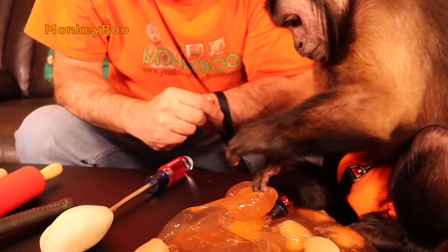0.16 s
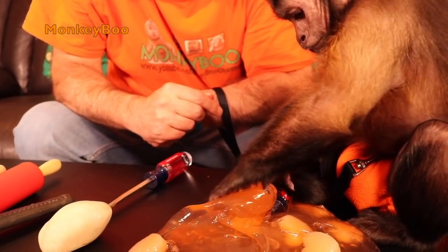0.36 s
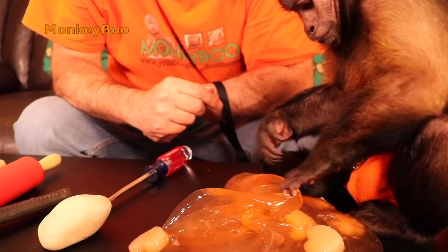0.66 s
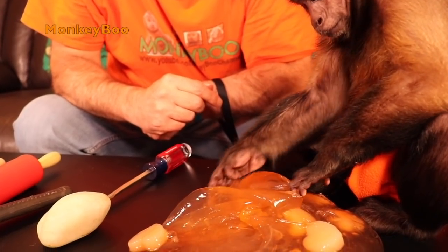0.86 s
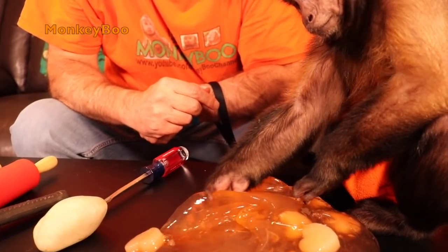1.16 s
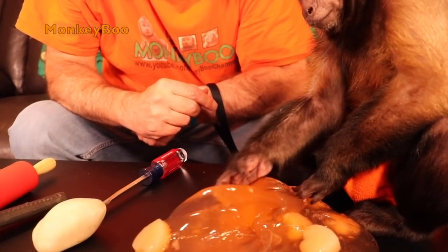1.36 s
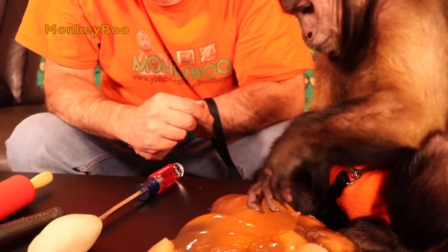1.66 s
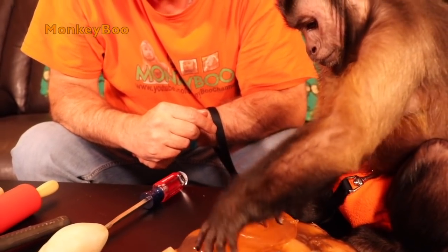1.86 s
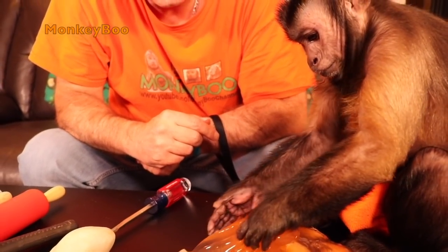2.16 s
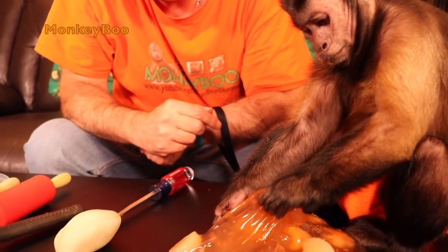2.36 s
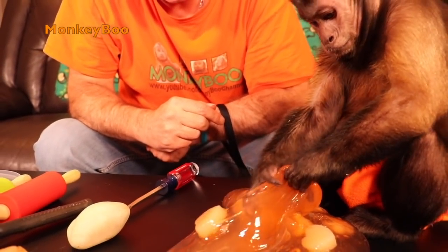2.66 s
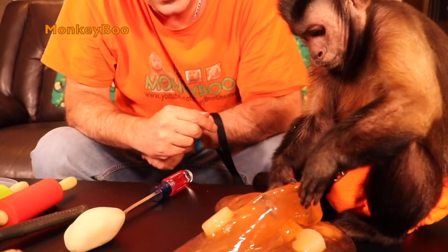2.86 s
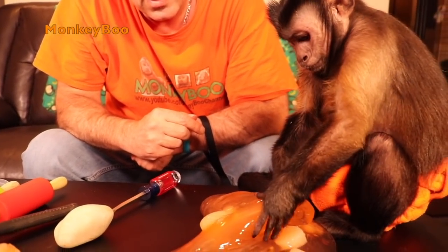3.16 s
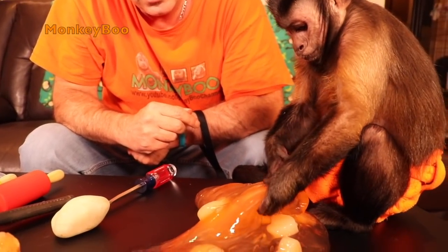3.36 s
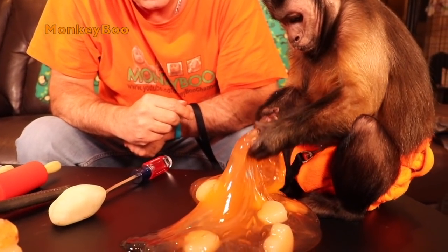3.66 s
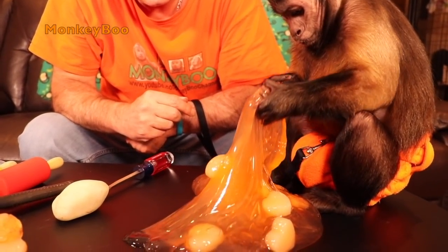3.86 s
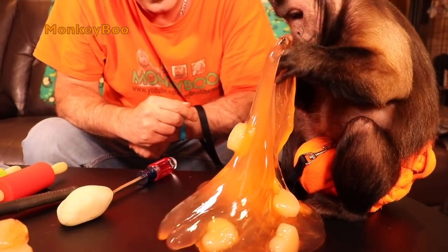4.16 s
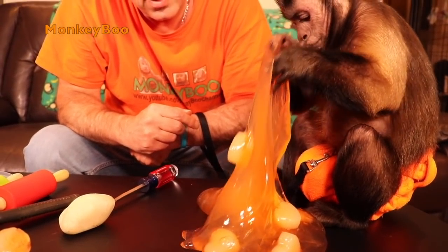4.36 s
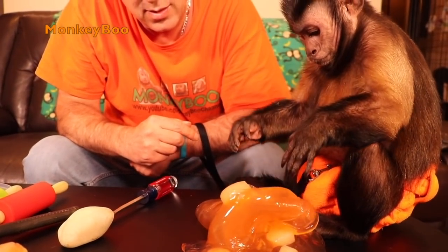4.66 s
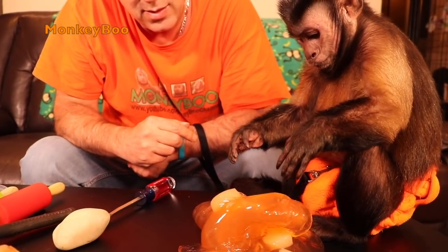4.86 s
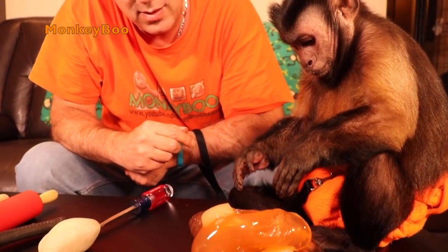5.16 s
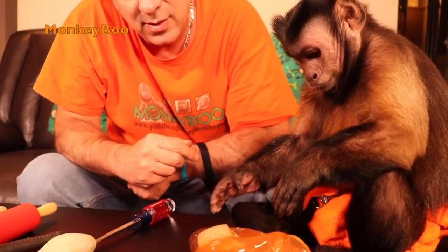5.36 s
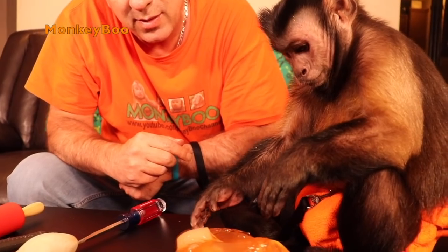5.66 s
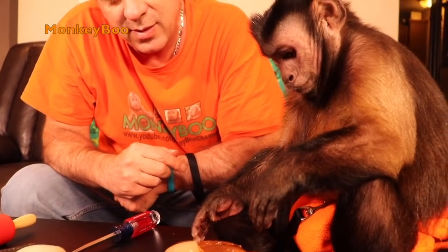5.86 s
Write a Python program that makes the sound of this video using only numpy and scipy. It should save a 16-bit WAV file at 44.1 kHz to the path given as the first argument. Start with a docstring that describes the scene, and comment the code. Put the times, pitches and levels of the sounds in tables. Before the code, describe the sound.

A small monkey, close and to the right of the microphone, gives a quick run of high, slightly raspy peeps that climb in pitch, then one short hoot. More rising runs follow as it paws and stretches sticky slime, with soft squelches, crackles, a few sharp pops and light clinks on the table. A faint hoot and whimper come before a last rising run. The room rings slightly over a low appliance hum.

```python
"""Short peeps in rising runs, then a hoot: a small monkey at a table, to the right of the microphone.
The peeps are raspy whistles, the hoots voiced pulses rich in partials. It paws and pulls a sticky
jelly that squelches, crackles and pops; nails tick and hard things clink on the table.
The place is a live room that rings after each sound, over steady air and an appliance hum."""
import sys
import numpy as np
from scipy import signal
from scipy.fft import rfft, irfft
from scipy.io import wavfile
from scipy.ndimage import uniform_filter1d

SR = 44100
rng = np.random.default_rng(int(sys.argv[2]) if len(sys.argv) > 2 else 0)


def file_out(sig):
    """Save sig as 16-bit WAV at sys.argv[1]."""
    # one column per channel
    cols = np.atleast_2d(sig).T
    # limit, then scale
    lim = np.clip(cols, -1, 1)
    pcm = np.round(lim * 32767).astype(np.int16)
    wavfile.write(sys.argv[1], SR, pcm)


N = 265248

# How alike the room sounds on the two sides of the microphone.
# Each row: frequency in Hz, left-right likeness (negative values count as 0).
LIKENESS = [(60, 0.97), (130, 0.97), (290, 0.93), (640, 0.58), (1410, -0.004), (3100, -0.63), (6820, 0.086),
            (15000, -0.61)]


def undb(db):
    return 10 ** (np.asarray(db) / 20)


def unit(x):
    """Scale to rms 1."""
    return x / np.sqrt(np.mean(x ** 2))


def band(x, hz, width):
    """Resonance of gain 1 at the centre; width in Hz."""
    return signal.lfilter(*signal.iirpeak(min(hz, .45 * SR), hz / width, fs=SR), x)


def along(table, hz):
    """Read (Hz, value) rows on a log-frequency axis."""
    f, v = np.transpose(table)
    return np.interp(np.log(hz + 1), np.log(f + 1), v)


def walk(rate, size=N):
    """Random levels held 1 / rate seconds and smoothed twice."""
    hold = int(SR / rate)
    steps = np.repeat(rng.standard_normal(size // hold + 1), hold)
    return 1.322 * uniform_filter1d(uniform_filter1d(steps, hold), hold)[:size]


def add(out, start, x):
    """Mix x in at start seconds."""
    i = int(round(start * SR))
    x = x[..., :N - i]
    out[..., i:i + x.shape[-1]] += x


def sides(pan_db):
    """Gains at the microphone's two sides; pan_db is left minus right."""
    return undb(np.array([[pan_db], [-pan_db]]) / 2)


def grains(rows, size, spread_db=1.6):
    """Crackling noise from grains of uneven size."""
    return rng.standard_normal((rows, size)) * undb(spread_db * rng.exponential(size=size))


def room_tone():
    """The bed of the place: steady air and the wavering hum of an appliance."""
    # Each row: frequency in Hz, relative noise density in dB.
    air_spectrum = [(12, -27), (20, -3), (48, -16), (81, -6), (113, -7), (198, -7), (234, -2), (301, -13),
                    (347, -8), (377, -17), (485, -15.5), (1440, -22), (3530, -30), (5530, -32),
                    (16000, -41)]
    # Each row: hum frequency in Hz, relative level in dB, pitch wander in Hz.
    hum_lines = [(75.3, -48.5, 3.03), (231, -53.5, 9.02), (278, -58, 5.88), (339, -61.5, 3.07)]
    hz = np.fft.rfftfreq(N, 1 / SR)
    alike = np.clip(along(LIKENESS, hz), 0, 1)
    mid, side = rfft(rng.standard_normal((2, N))) * undb(along(air_spectrum, hz))
    air = irfft(np.sqrt(1 + alike) * mid + np.sqrt(1 - alike) * side * np.array([[1], [-1]]), N)
    out = unit(air) * undb(-44.5 + 0.067 * walk(2.85))
    for hum_hz, db, wander_hz in hum_lines:
        phase = 2 * np.pi * np.cumsum(hum_hz + wander_hz * walk(9)) / SR
        out += undb(db + 1 + 0.9 * walk(7.6)) * np.sin(phase)
    return out


def room_response(onset_s):
    """What the walls return to the microphone: early echoes and a tail that lasts longest near 1 kHz."""
    # Each row: frequency in Hz, seconds to fall 60 dB.
    decay_times = [(200, 0.26), (1000, 0.68), (3500, 0.4), (7000, 0.39), (14000, 0.35)]
    # Near surfaces. Each row: delay in seconds, left gain in dB, right gain in dB.
    echoes = [(.0012, -22, -35.5), (.0045, -21, -12), (.009, -15, -3.5), (0.0161, -11, -6), (.024, -8, -10)]
    t = np.arange(SR) / SR
    response = np.zeros((2, SR))
    shared = rng.standard_normal(SR)
    for hz in 125 * 2 ** np.arange(0, 7.1, .5):
        alike = np.clip(along(LIKENESS, hz), 0, 1)
        noise = np.sqrt(alike) * shared + np.sqrt(1 - alike) * rng.standard_normal((2, SR))
        response += band(noise, hz, hz / 3) * undb(-60 * t / along(decay_times, hz))
    response *= undb(-27.5) * np.clip(t / onset_s, 0, 1)
    for delay, left_db, right_db in echoes:
        response[:, int(delay * SR)] += undb([left_db, right_db])
    return response


def stretch():
    """Fine patchy crackle as the jelly is drawn out and fur brushes the table."""
    # One level curve a pull. Each row: time in seconds, level in dB.
    pulls = [
        [(1.45, -58), (1.6, -67), (1.78, -58), (1.85, -50)],
        [(3.7, -46), (3.86, -54), (3.93, -49), (4.0, -52.5), (4.07, -49.5), (4.302, -63), (4.554, -62),
         (4.684, -52.5), (4.91, -53), (5.08, -58.5), (5.426, -90), (5.55, -58)],
    ]
    out = np.zeros((2, N))
    for pull in pulls:
        times, db = np.transpose(pull)
        t = np.arange(times[0], times[-1], 1 / SR)
        crackle = unit(band(band(grains(2, len(t)), 1650, 5600), 2800, 10000))
        patches_db = 1.5 * walk(25, len(t))
        gate = np.clip(np.minimum(t - times[0], times[-1] - t) / 0.073, 0, 1)
        add(out, times[0], crackle * gate * undb(np.interp(t, times, db) + patches_db))
    return out


def ticks(t60_s=0.029):
    """Nails and sticky threads slip, each a scratchy, fast-fading burst of noise."""
    # Each row: start in seconds, relative level in dB, centre in Hz.
    slips = [(0.612, -49, 9930), (0.6823, -45.5, 7400), (1.1227, -39, 6000), (1.1488, -49, 8200),
             (1.5244, -48, 6880), (1.5604, -45, 5800), (2.596, -33, 5900), (2.9282, -44, 8800),
             (2.948, -42, 6210), (4.597, -40, 7040), (4.9736, -42, 5500), (5.4114, -49, 10000),
             (5.846, -44, 13000)]
    out, t = np.zeros((2, N)), np.arange(SR // 20) / SR
    for start, db, hz in slips:
        burst = unit(rng.standard_normal(len(t))) * undb(db - 60 * t / t60_s)
        add(out, start, sides(-7) * band(band(burst, hz, .6 * hz), hz, .6 * hz))
    return out


def clinks():
    """Hard things on the table ring in one mode each, rattled rather than struck clean."""
    # Each row: start in seconds, level in dB, ring in Hz, seconds to fall 60 dB.
    knocks = [(1.57, -48.5, 2720, 0.052), (1.708, -46.5, 3760, 0.12), (2.12, -49.5, 1390, 0.17),
              (2.989, -45, 1080, 0.25), (3.128, -16.5, 2190, 0.011), (3.74, -22.5, 1350, 0.021),
              (3.974, -33, 175, 0.074), (4.048, -35.5, 3440, 0.034), (4.186, -43.5, 950, 0.29),
              (4.655, -48.5, 5060, 0.14), (4.67, -51, 4270, 0.17), (5.012, -47.5, 7500, 0.22)]
    out, t = np.zeros((2, N)), np.arange(SR // 3) / SR
    attack = np.clip(t / 0.004, 0, 1)
    for start, db, hz, t60 in knocks:
        ring = np.sin(2 * np.pi * hz * t + 1.8 * walk(120, len(t)))
        add(out, start, undb(db - 60 * t / t60) * sides(-5) * attack * ring)
    return out


def squelches(rise_s=0.02, fade_s=0.046, fizz_hz=3500):
    """Wet crackle under a paw: a table thump, a hollow body and a fizz that swells a little later."""
    # Each row: start in seconds, level in dB, body in Hz, thump and fizz in dB against the body.
    presses = [(1.64, -42, 470, -6, -18), (1.712, -47, 1590, 0, -17), (2.987, -46.5, 1070, -19, -2.5),
               (3.131, -49, 1690, -5, 9.5), (3.735, -35, 1260, 1.5, -4.5), (3.903, -51.5, 1370, 9, 5.5),
               (3.967, -55, 1420, 13.5, -5), (4.044, -42.5, 1050, -20, -2), (4.179, -41, 1040, -6, -4),
               (4.599, -48, 1420, 5, 4), (4.657, -46.5, 1020, -15, -16), (4.772, -45, 1970, -1, 1),
               (4.852, -44, 966, -6, -10), (5.015, -36.5, 1070, -9, -8.5), (5.405, -47.5, 1120, -9, -5),
               (5.877, -51, 1120, 0.5, 0.5)]
    out, t = np.zeros((2, N)), np.arange(SR // 3) / SR
    swell = np.sin(np.pi / 2 * np.clip(t / rise_s, 0, 1))
    for start, db, hz, thump_db, fizz_db in presses:
        crackle = grains(4, len(t))
        thump = undb(thump_db) * unit(band(band(crackle[0], 140, 150), 140, 150))
        body = unit(band(band(crackle[1], hz, 0.91 * hz), hz, 0.91 * hz))
        fizz = undb(fizz_db) * unit(band(band(crackle[2:], fizz_hz, 4000), fizz_hz, 14000))
        fade = np.exp(-t / fade_s) * undb(walk(74, len(t)))
        add(out, start, undb(db) * sides(-2.5) * fade * (swell * (body + thump) + swell ** 2 * fizz))
    return out


def pops(edge_hz=13500):
    """Bubbles burst in the jelly: very short rings with a bright edge."""
    # Each row: start in seconds, level in dB, ring in Hz, edge in dB against the ring,
    # left minus right in dB, seconds to fall 60 dB.
    bubbles = [(2.0907, 7, 9600, -5, -.6, 0.00032), (3.1286, -15.5, 6800, -16, -1.5, 0.0013),
               (3.14, -20.5, 10300, -2, -9, 0.0014), (3.6569, -19, 9660, -11, -5, 0.0023)]
    out, t = np.zeros((2, N)), np.arange(SR // 50) / SR
    attack = np.clip(t / .00012, 0, 1)
    for start, db, hz, edge_db, pan_db, t60 in bubbles:
        ring = np.sin(2 * np.pi * hz * t) + undb(edge_db) * np.sin(2 * np.pi * edge_hz * t)
        add(out, start, undb(db - 60 * t / t60) * sides(pan_db) * attack * ring)
    return out


def hoots(closing_s=0.037):
    """The monkey's voiced pulses, a thin hiss on each. Returns the direct sound and the wall feed."""
    # One contour a hoot, the last a soft drooping whimper.
    # Each row: time in seconds, pitch in Hz, relative level in dB.
    contours = [
        [(0.462, 517, -37), (0.508, 554.7, -27.5), (0.532, 544.6, -25.5), (0.546, 522, -25.5),
         (0.556, 477, -47)],
        [(4.494, 704, -42.5), (4.515, 736.4, -35.5), (4.535, 737, -37.5), (4.552, 692, -40)],
        [(4.59, 752, -43), (4.615, 732, -47.5), (4.675, 664, -51)],
    ]
    # One spectrum a hoot. Each row: multiple of the pitch, level in dB before the tilt.
    spectra = [
        [(1, 4.5), (2, 0), (3, -5.5), (4, -7.5), (5, -5.5), (6, -6.5), (7, -10), (8, -19), (9, -18), (10, -39)],
        [(1, 0.5), (2, 0), (3, -17.5), (4, -12.5), (5, -12), (6, -23), (7, -32), (8, -28)],
        [(1, 4), (2, -18), (3, -33)],
    ]
    wall_feeds_db = [-14.5, -6, -8.5]
    jitters = [.0015, .011, .014]  # shares of the pitch
    out = np.zeros((2, N))
    for contour, partials, wall_db, jitter in zip(contours, spectra, wall_feeds_db, jitters):
        times, hz, db = np.transpose(contour)
        start, end = times[0], times[-1]
        t = np.arange(start, end, 1 / SR)
        pitch = np.interp(t, times, hz) * (1 + jitter * walk(315, len(t)))
        phase = 2 * np.pi * np.cumsum(pitch) / SR
        tilt = np.interp(t, [end - closing_s, end], [4.5, 1.5])  # dB per octave: the closing mouth dulls
        # the throat delays the upper partials, so each pulse rings out instead of spiking
        voice = unit(sum(-undb(partial_db + tilt * np.log2(k)) * np.cos(k * phase - .15 * k * k)
                         for k, partial_db in partials))
        hiss = undb(-36) * unit(band(rng.standard_normal(len(t)) * (1 + np.cos(phase)), 13400, 1800))
        gate = np.clip(np.minimum(t - start, end - t) / 0.005, 0, 1)
        add(out, start, undb([[0], [wall_db]]) * (voice + hiss) * gate * undb(np.interp(t, times, db)))
    return out


def peeps(attack_s=0.0032, release_s=0.0089, rasp=.32, rasp_hz=300):
    """The monkey's whistles scoop up to pitch, climb and sag at the end, with a slight rasp."""
    # Each row: start in seconds, pitch in Hz, level in dB, second partial in dB against the first,
    # length in seconds.
    notes = [(0.025, 2464, -31, 1, 0.04), (0.147, 3143, -29, -7, 0.018), (0.213, 3486, -26.5, -16, 0.025),
             (0.281, 3526, -23, -20.5, 0.026), (1.76, 2867, -36.5, 2, 0.027),
             (1.831, 3324, -37.5, -8, 0.019), (1.898, 3507, -35.5, -17.5, 0.022),
             (1.965, 3956, -48, -2, 0.061), (2.053, 4138, -29, -12, 0.026), (2.128, 4294, -19, -29, 0.023),
             (3.023, 2655, -33, -4.5, 0.023), (3.084, 3054, -28.5, -22.5, 0.029),
             (3.147, 3428, -27, -30, 0.029), (3.214, 3777, -29, -28.5, 0.021),
             (3.286, 4077, -35, -20.5, 0.018), (3.363, 4280, -33, -28, 0.023),
             (3.441, 4350, -32, -31, 0.024), (5.593, 2316, -51.5, 0.5, 0.043),
             (5.663, 2626, -40, -8.5, 0.022), (5.719, 2805, -40, -18, 0.029),
             (5.792, 3210, -34.5, -37, 0.03), (5.858, 3392, -21, -20.5, 0.025)]
    scoop, climb, sag = .016, .026, .028  # shares of the pitch
    out = np.zeros(N)
    for start, hz, db, second_db, length in notes:
        t = np.arange(int(length * SR)) / SR
        bend = climb * (t / t[-1] - .5) - scoop * np.exp(-t / 0.006) - sag * np.exp((t - t[-1]) / 0.0029)
        phase = 2 * np.pi * np.cumsum(hz * (1 + bend)) / SR
        # unsteady vocal folds shake phase and level, spreading the tone into a narrow band
        phase += rasp * walk(2 * rasp_hz, len(t))
        shake = 1 + rasp / 2 * walk(rasp_hz, len(t))
        gate = np.clip(t / attack_s, 0, 1) * np.clip((t[-1] - t) / release_s, 0, 1)
        overtones = np.sin(2 * phase) + undb(-25) * np.sin(3 * phase)
        add(out, start, undb(db) * gate * shake * (np.sin(phase) + undb(second_db) * overtones))
    return out


def scene(left_lag_s=0.00011):
    """Monkey, table and room as they reach a stereo microphone."""
    peep = peeps()
    hoot, hoot_to_walls = hoots()
    snaps = pops() + ticks()
    handling = squelches() + stretch() + clinks()
    voice = peep * sides(-8.5) + undb(3) * hoot * sides(-0.7)
    # the monkey sits to the right, so its voice has farther to go to the left side
    lag = np.exp(-2j * np.pi * np.fft.rfftfreq(N, 1 / SR) * left_lag_s)
    voice[0] = irfft(rfft(voice[0]) * lag, N)
    # whistles are aimed away from the microphone, so the walls get more of them
    to_walls = undb(-0.5) * peep + hoot_to_walls
    to_walls += undb(-9.5) * snaps.mean(axis=0) + undb(-11.5) * handling.mean(axis=0)
    reverb = signal.fftconvolve(to_walls[None], room_response(onset_s=0.0099), axes=1)[:, :N]
    return voice + snaps + handling + reverb + room_tone()


def record(dry, top_hz=15750):
    """The camera's microphone chain cuts the top treble steeply."""
    return signal.sosfilt(signal.ellip(10, .2, 70, top_hz, fs=SR, output="sos"), dry)


dry = scene()
out = record(dry)
file_out(out)
```